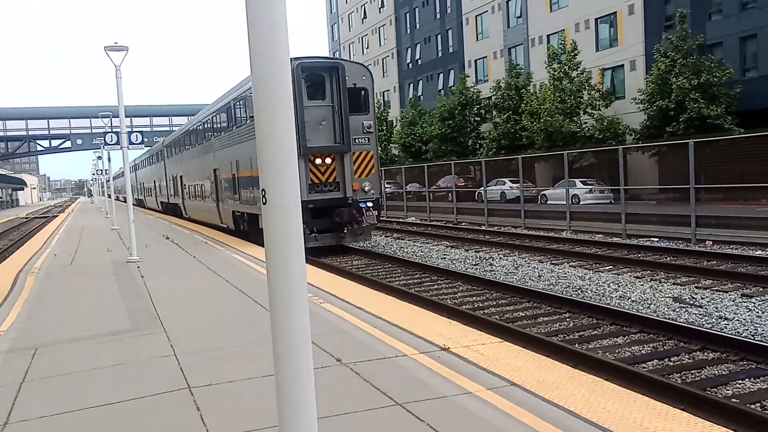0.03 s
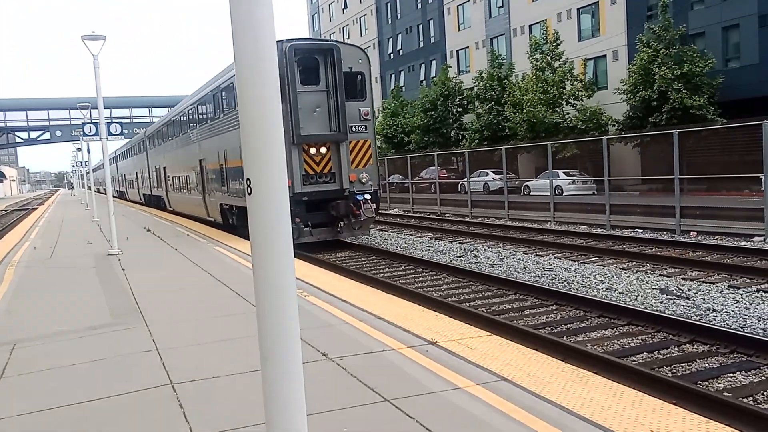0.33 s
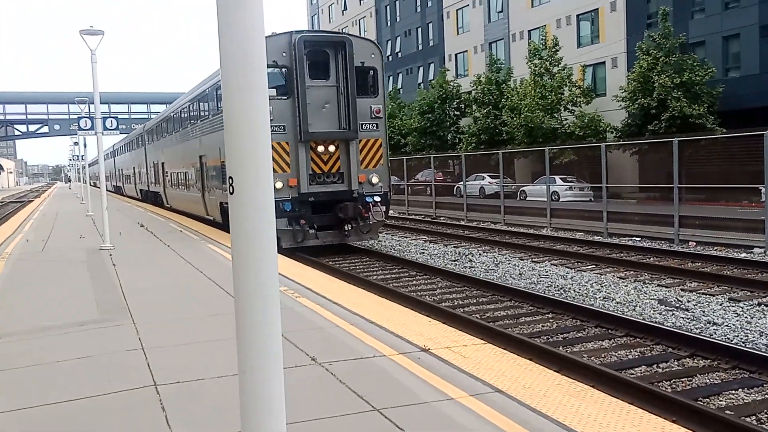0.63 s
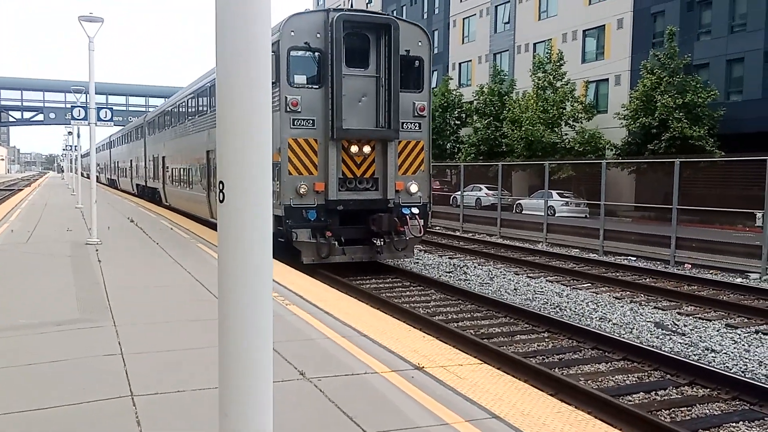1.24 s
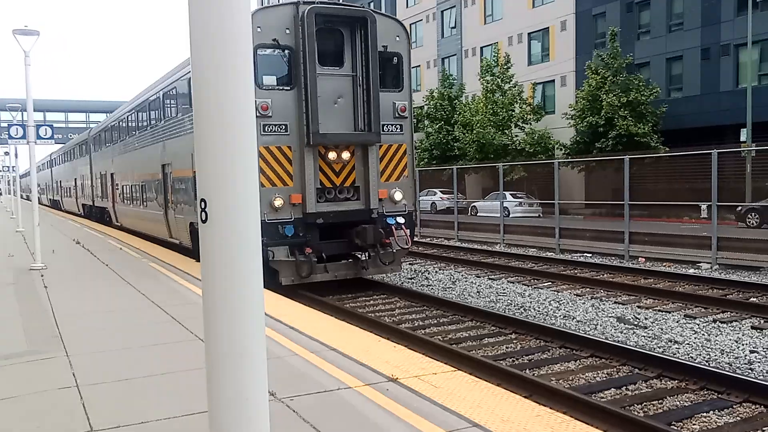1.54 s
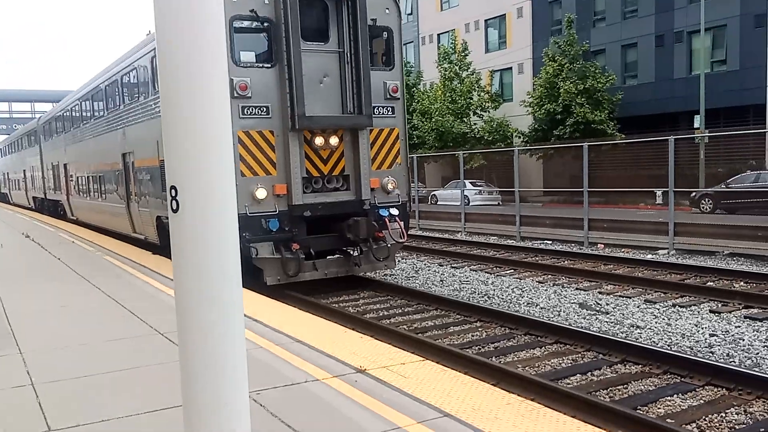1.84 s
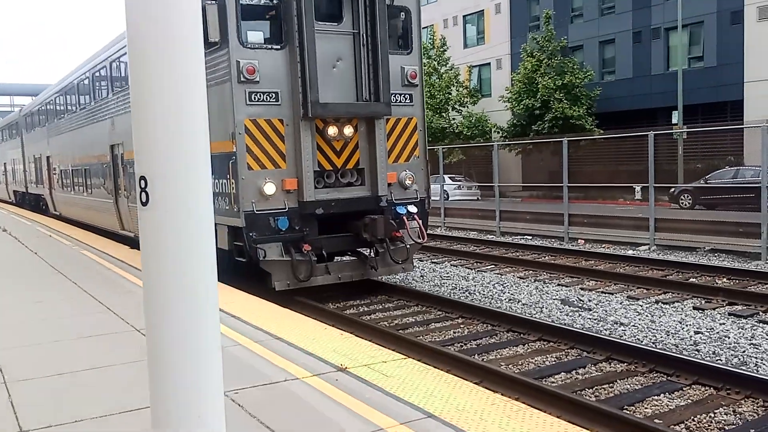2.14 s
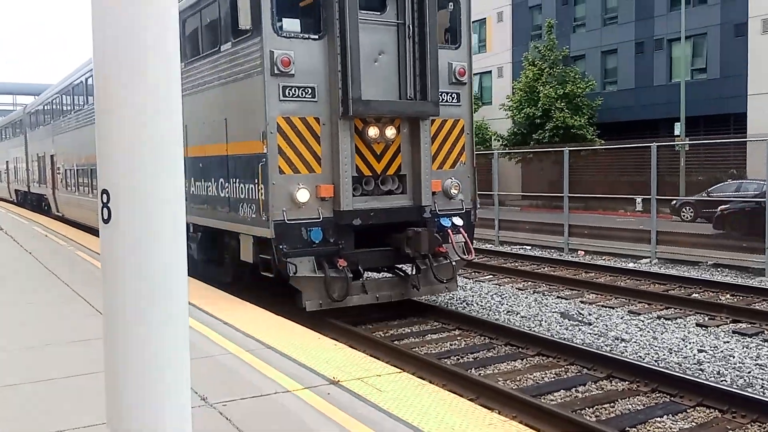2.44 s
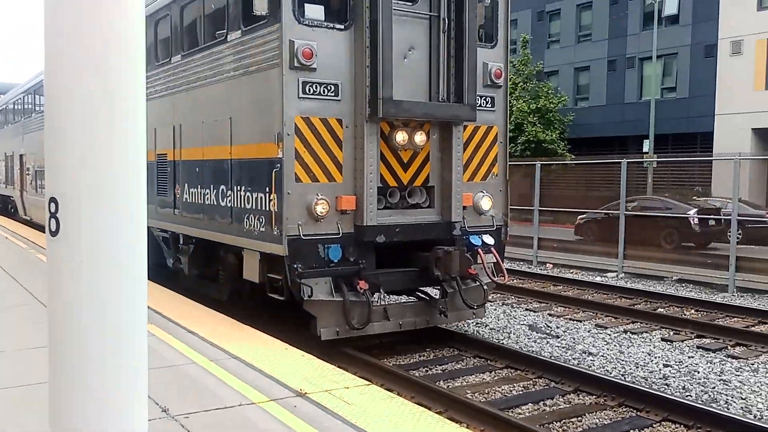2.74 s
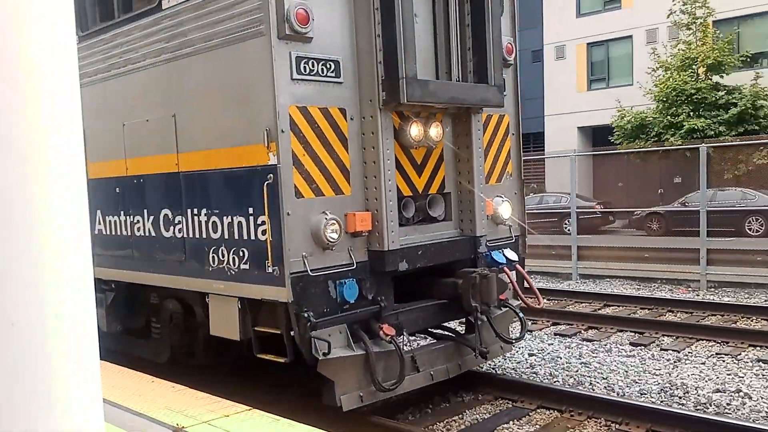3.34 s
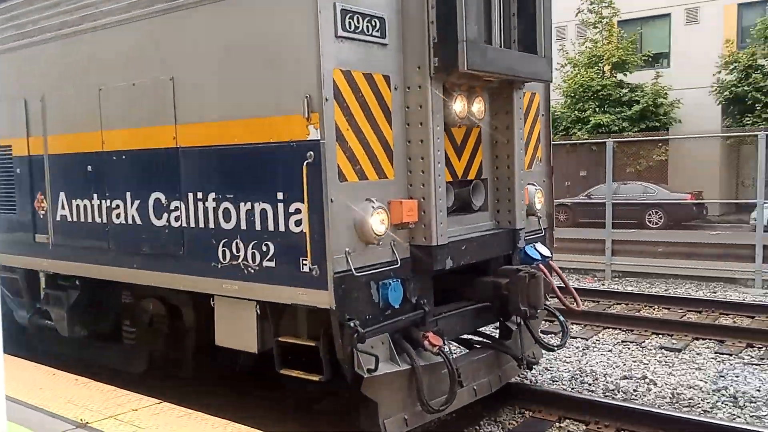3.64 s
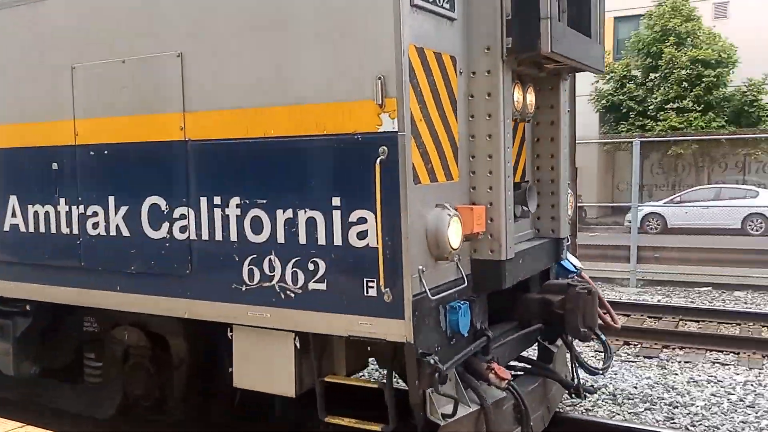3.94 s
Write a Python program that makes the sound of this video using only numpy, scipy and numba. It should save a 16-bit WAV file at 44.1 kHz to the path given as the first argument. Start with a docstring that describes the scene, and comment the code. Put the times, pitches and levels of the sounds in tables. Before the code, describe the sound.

A train bell clangs from the start and again at about 0.7, 1.4, 2.1, 2.9 and 3.6 seconds, growing brighter, each stroke ringing on with a wavering echo across the platform. Small air puffs fall between strokes. Underneath, the approaching train rumbles and rolls with growing hiss and faint, thin squeaks in the first two seconds. At 3.3 seconds compressed air spits sharply, leaving a slowly fading rush.

```python
"""A bell strikes steadily over the rumble, rolling noise and hiss of a train nearing a platform.
Each stroke excites decaying partials, which beat against their Doppler-lowered echoes from the
platform and house fronts. Between strokes the air-driven ringer resets with a puff.
Thin squeaks and low booms come and go, and a valve spits compressed air once.
An automatic gain control ducks the whole sound at the loud strokes."""
import sys
import numpy as np
from scipy import signal
from scipy.fft import rfft, irfft, next_fast_len
from scipy.io import wavfile
from scipy.ndimage import uniform_filter1d, map_coordinates
from numba import njit

SR = 44100
rng = np.random.default_rng(int(sys.argv[2]) if len(sys.argv) > 2 else 0)


def generate_wav(signal):
    """Clip the signal to [-1, 1] and save it as 16-bit WAV at the path in sys.argv[1]."""
    frames = np.transpose(np.atleast_2d(signal))
    scaled = np.clip(frames, -1, 1) * 32767
    pcm = np.round(scaled).astype(np.int16)
    wavfile.write(sys.argv[1], SR, pcm)


N = 176400
STROKE_ATTACK_S = 0.011

# Blows of the clapper: start_s, level_db, bright_db (added to the upper partials and the clack)
STROKES = [(-.052, -2, 0.5), (.683, -1, 1), (1.42, 0, 3), (2.149, -0.5, 3.5), (2.887, -2, 7),
           (3.621, 3, 7.5)]


def amp(db):
    """Amplitude ratio of a level in decibels."""
    return 10 ** (np.asarray(db) / 20)


def unit(x):
    """Normalisation to an rms of 1."""
    return x / np.sqrt(np.mean(x ** 2) + 1e-20)


def clock():
    """Sample times in seconds."""
    return np.arange(N) / SR


def wobble(rate_hz):
    """Smooth random modulation: a spline through Gaussian knots."""
    knots = rng.standard_normal(256)
    return map_coordinates(knots, [clock() * rate_hz], mode="mirror")


def filtered(x, response):
    """Linear filtering: the spectrum is multiplied by a frequency response."""
    size = next_fast_len(N + SR // 4)
    return irfft(rfft(x, size) * response(np.fft.rfftfreq(size, 1 / SR)), size)[:N]


def noise(spectrum, patchy_db=0):
    """Spectrally shaped noise of rms 1, its gain varying in random patches of time and frequency."""
    white = signal.stft(rng.standard_normal(N), nperseg=512)[2]
    patches = uniform_filter1d(rng.standard_normal(white.shape), size=5, axis=0)
    patches = unit(uniform_filter1d(patches, size=12, axis=1))
    mottled = signal.istft(white * amp(patchy_db * patches), nperseg=512)[1][:N]
    knots_hz, db = np.transpose(spectrum)
    return unit(filtered(mottled, lambda hz: amp(np.interp(np.log(hz + 1), np.log(knots_hz), db))))


def ring(t, attack_s, t60_s):
    """Exponential damping: an envelope that rises from t = 0, then falls 60 dB in t60_s."""
    t = np.maximum(t, 0)
    return (1 - np.exp(-t / attack_s)) * np.exp(-np.log(1000) * t / t60_s)


def echo_paths(count, first_s=0.0047, last_s=0.34, fade_db_per_s=46.5):
    """Doppler effect on reflections: late ones come from the side and behind, so tend to sound lower."""
    place = (np.arange(count) + rng.random(count)) / count
    delay_s = first_s + (last_s - first_s) * place ** 1.303
    gain = amp(-16 - fade_db_per_s * delay_s)
    drop = 0.01185 * (1 - np.exp(-delay_s / 0.1482))  # fraction of the pitch
    drop += 0.009 * rng.standard_normal(count)
    return delay_s[:, None], gain[:, None], drop[:, None]


def bell():
    """Modal vibration: each stroke rings the partials, which beat against their detuned echoes."""
    # Modes above the hum note: pitch_hz, level_db, t60_s, echo_boost_db
    partials = [(2087.6, -16, 0.86, 7.5), (2344.5, -2, 0.86, 2), (3878, -21, 1, 6.5),
                (3881, -15.5, 0.76, 2), (4714, -23.5, 0.14, -0.5), (5740, -26.5, 0.46, 5),
                (5750, -24, 0.22, 2.5), (6285, -43.5, 0.36, 10), (7870, -42, 0.23, 5),
                (10096, -40, 0.19, 6), (12660, -57.5, .26, 7.5)]
    strike_hz = partials[1][0]
    age_s = np.arange(0, 1.2, 0.001)  # coarse time grid for the envelopes
    out = np.zeros(N)
    for start_s, stroke_db, bright_db in STROKES:
        live = slice(max(0, int(start_s * SR)), int((start_s + age_s[-1]) * SR))
        t = clock()[live] - start_s
        delay_s, gain, drop = echo_paths(count=40)
        echo_age_s = age_s - delay_s
        for hz, level_db, t60_s, echo_boost_db in partials:
            turns = rng.random(delay_s.shape) - hz * drop * echo_age_s
            echoes = gain * ring(echo_age_s, STROKE_ATTACK_S, t60_s) * np.exp(2j * np.pi * turns)
            envelope = ring(age_s, STROKE_ATTACK_S, t60_s) + amp(echo_boost_db) * echoes.sum(axis=0)
            carrier = np.exp(2j * np.pi * (hz * t + rng.random()))
            partial = np.real(np.interp(t, age_s, envelope) * carrier)
            colour_db = bright_db * (hz > np.sqrt(2) * strike_hz)
            out[live] += amp(stroke_db + level_db + colour_db) * partial
    return amp(0.5) * out


def hum(pitch_hz=1109.7, flutter_db=5):
    """Multipath interference: the bell's long-ringing lowest partial swells, fades and wavers."""
    # Contour of the hum note: time_s, level_db
    contour = [(0, -31.5), (.13, -33.5), (0.422, -39.5), (.53, -50.5), (.68, -51.5), (.82, -26),
               (.96, -35.5), (1.2, -45), (1.42, -59), (1.549, -45.5), (1.652, -34), (1.76, -42.5),
               (1.95, -47), (2.05, -57.5), (2.15, -56.5), (2.289, -23), (2.57, -32), (2.66, -60),
               (2.8, -41), (2.88, -52), (2.95, -23), (3.06, -40.5), (3.18, -33), (3.37, -58.5), (3.54, -34),
               (3.615, -36.5), (3.68, -20.5), (3.89, -26), (4, -44)]
    level_db = np.interp(clock(), *np.transpose(contour)) + flutter_db * wobble(24)
    return amp(level_db) * unit(np.sin(2 * np.pi * pitch_hz * clock() + wobble(22)))


def ringer():
    """Impact and air release: the clapper clacks at each stroke, and its piston resets with a puff."""
    # Spectrum of the clack: frequency_hz, level_db
    clack_spectrum = [(300, -40), (1200, -15.5), (1700, 0), (2300, 7.5), (3300, 1.5), (5000, 1),
                      (7000, -36.5), (15000, -34)]
    # Piston resets: start_s, level_db
    resets = [(0.431, -47), (1.164, -40), (1.899, -36.5), (2.628, -30), (3.373, -24.5)]
    # Spectrum of the puff: frequency_hz, level_db
    puff_spectrum = [(150, -53), (700, -38), (950, -5.5), (1250, -34), (1560, 1), (2000, -27.5),
                     (2800, -17.5), (3600, -18.5), (4400, -9), (4850, -2), (5400, -7.5), (6200, -22.5),
                     (8000, -34), (15000, -31.5)]
    t = clock()
    clacks = sum(amp(db + bright_db - 25.5) * ring(t - start_s, STROKE_ATTACK_S / 2, t60_s=0.094)
                 for start_s, db, bright_db in STROKES)
    puffs = sum(amp(db) * ring(t - start_s, attack_s=0.0035, t60_s=0.28) for start_s, db in resets)
    return clacks * noise(clack_spectrum) + puffs * noise(puff_spectrum)


def train():
    """Tonal and broadband noise add: engine, wheels on rails, and an air hiss growing as the cab nears."""
    # Noise levels during the approach: time_s, rumble_db, rolling_db, hiss_db
    approach = [(0, -43, -39, -62.5), (0.599, -48, -45, -56.5), (1.3, -47.5, -46.5, -54.5),
                (1.648, -44, -42, -44.5), (2.051, -49, -44.5, -47), (2.401, -44, -42.5, -44),
                (2.8, -50.5, -40, -44), (3.22, -45, -43.5, -40.5), (3.55, -51, -42.5, -41.5),
                (4, -41.5, -40, -35.5)]
    # Engine and blower tones: pitch_hz, level_db
    engine_tones = [(74, -56.5), (116, -60), (238, -58.5)]
    # Spectra of engine rumble, rolling wheels and air hiss: frequency_hz, level_db
    rumble_spectrum = [(20, -26.5), (38, -22), (55, -11), (74, -7.5), (100, -2), (125, -5.5), (160, -9.5),
                       (200, -6.5), (240, 1), (300, -9.5), (480, -18), (1000, -43.5), (3000, -71.5)]
    rolling_spectrum = [(150, -12.5), (480, -6), (800, 4), (1300, 1.5), (1600, -1), (2000, 3), (2700, 7),
                        (3300, -3.5), (4600, 4.5), (5200, -5), (6300, -5), (7400, -27), (10000, -21),
                        (16000, -29)]
    hiss_spectrum = [(2000, -26.5), (6500, -5.5), (8400, -16.5), (10200, -3.5), (11700, -10),
                     (13600, -10.5), (15000, -1.5), (16000, -2.5)]
    t = clock()
    times_s, *levels = np.transpose(approach)
    rumble_db, rolling_db, hiss_db = (np.interp(t, times_s, db) for db in levels)
    tones = sum(amp(db + 2.5 * wobble(14)) * np.sin(2 * np.pi * hz * t + 1.9 * wobble(12))
                for hz, db in engine_tones)
    rumble = amp(rumble_db + 0.68 * wobble(14)) * noise(rumble_spectrum, patchy_db=4)
    rolling = amp(rolling_db + 1.3 * wobble(17)) * noise(rolling_spectrum, patchy_db=3)
    hiss = amp(hiss_db) * noise(hiss_spectrum, patchy_db=3.2)
    return tones + rumble + rolling + hiss


def squeaks():
    """Narrow-band noise sounds pitched: damped bursts near 10 kHz are the moving train's thin squeaks."""
    # Squeaks: start_s, level_db
    bursts = [(0.429, -51.5), (1.17, -58), (1.265, -48), (1.899, -37.5), (1.991, -46.5)]
    # Spectrum of a squeak: frequency_hz, level_db
    spectrum = [(5000, -44), (7500, -32), (9300, -16), (9950, 9.5), (10600, -4), (12200, -7), (13500, -30)]
    envelope = sum(amp(db) * ring(clock() - start_s, attack_s=0.005, t60_s=0.16) for start_s, db in bursts)
    return envelope * noise(spectrum)


def booms():
    """Amplitude modulation: low noise bands swell briefly under Gaussian envelopes."""
    # Low surges: peak_s, width_s, pitch_hz, level_db
    swells = [(1.83, .07, 77.5, -40.5), (3.2, 0.061, 90, -40), (3.49, .08, 132, -42.5)]
    out = np.zeros(N)
    for peak_s, width_s, hz, db in swells:
        envelope = np.exp(-0.5 * ((clock() - peak_s) / width_s) ** 2)
        band = noise([(hz / 4, -40), (hz / 2, -18), (hz, 0), (2 * hz, -22), (8 * hz, -90)])
        out += amp(db) * envelope * band
    return out


def valve(start_s=3.308):
    """Jet noise: compressed air escapes in a sharp spit and a duller, slowly decaying rush."""
    # Spectra of the escaping air: frequency_hz, level_db
    spit_spectrum = [(200, -32), (900, -33), (1600, -1), (5500, 3.5), (8000, -8), (10500, 1), (13000, -9),
                     (15500, 0.5)]
    rush_spectrum = [(200, -29), (500, -24), (900, -18), (1250, -40), (1700, -4.5), (2800, 13.5), (4000, 5),
                     (5500, 6.5), (7500, -14), (15000, -26.5)]
    t = clock() - start_s
    gate = np.interp(t, [0, 0.008, 0.04, 0.05], [0, 1, 1, 0])
    spit = amp(-26.5) * gate * noise(spit_spectrum, patchy_db=3.5)
    rush = amp(-35) * ring(t, attack_s=0.012, t60_s=5.7) * noise(rush_spectrum, patchy_db=4)
    return spit + rush


@njit
def follow(level, attack_s, release_s):
    """Envelope follower: a first-order lag with one time constant for rising and one for falling."""
    out, held = np.zeros(len(level)), level[:500].max()
    for i in range(len(level)):
        lag_s = attack_s if level[i] > held else release_s
        held += (level[i] - held) / (lag_s * SR)
        out[i] = held
    return out


def scene():
    """Superposition: all sources add at the platform, in one channel."""
    return (bell() + hum() + ringer() + train() + squeaks() + booms() + valve())[None]


def record(dry):
    """Automatic gain control: loud strokes duck the gain, which recovers slowly; a low-pass follows."""
    threshold_db, window_s, lookahead_s, cutoff_hz = -15.5, 0.018, 0.0073, 15850
    t = clock()
    power = np.abs(uniform_filter1d(dry[0] ** 2, size=int(window_s * SR)))
    excess_db = np.maximum(10 * np.log10(power + 1e-12) - threshold_db, 0)
    duck_db = follow(excess_db, attack_s=0.0013, release_s=0.29)
    gain = amp(-np.interp(t + lookahead_s, t, duck_db))
    edge_fade = np.clip(np.minimum(t, t[::-1]) / 0.004, 0, 1)
    return filtered(dry[0] * gain * edge_fade, lambda hz: hz < cutoff_hz)[None]


dry = scene()
out = record(dry)
generate_wav(out)
```